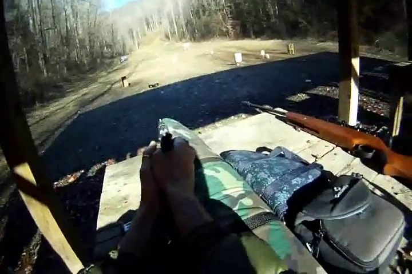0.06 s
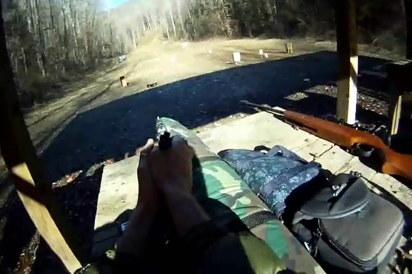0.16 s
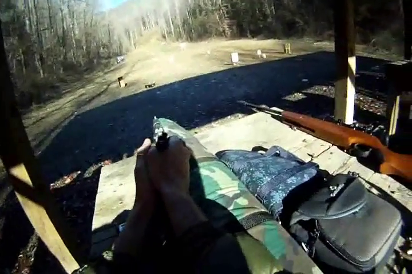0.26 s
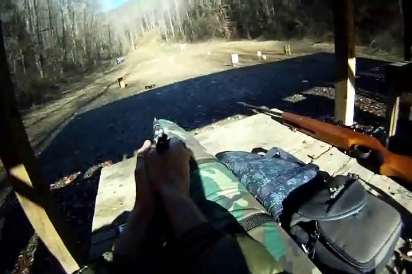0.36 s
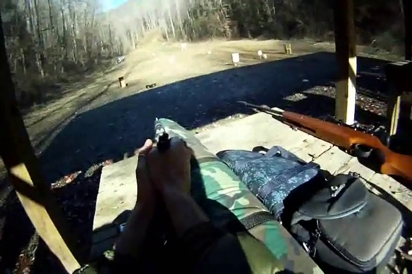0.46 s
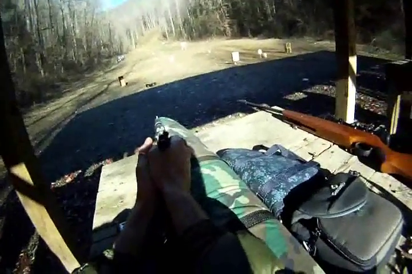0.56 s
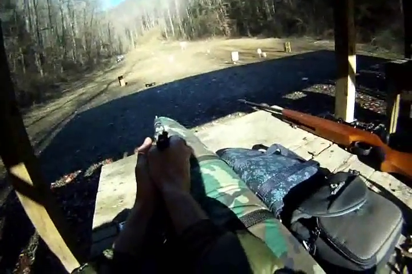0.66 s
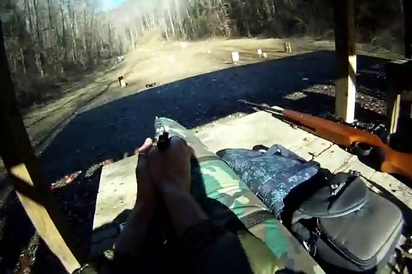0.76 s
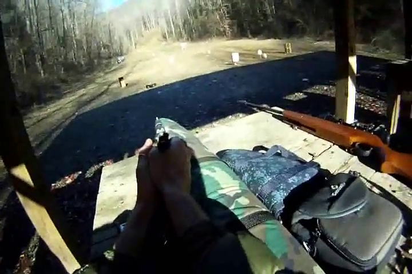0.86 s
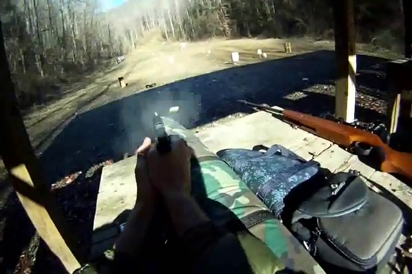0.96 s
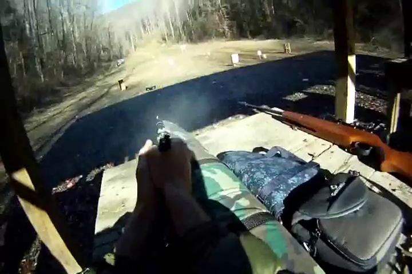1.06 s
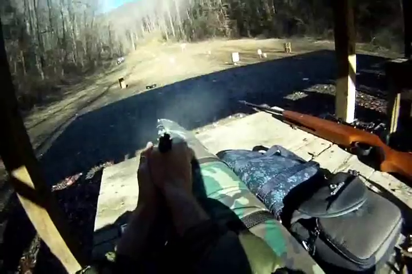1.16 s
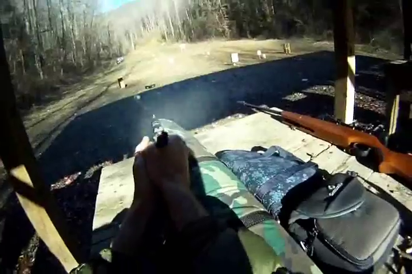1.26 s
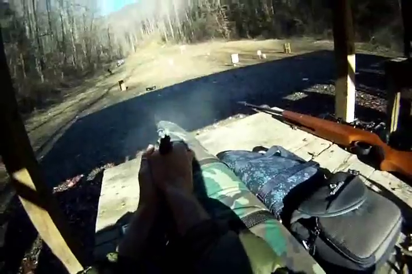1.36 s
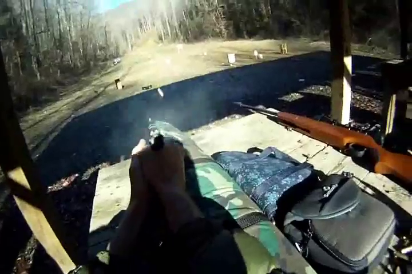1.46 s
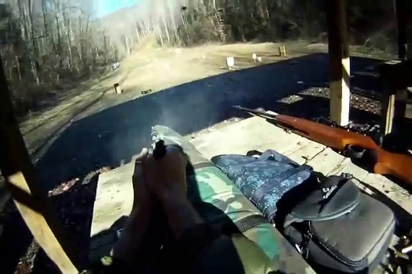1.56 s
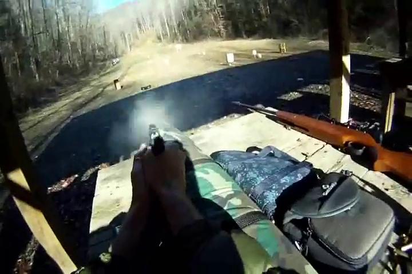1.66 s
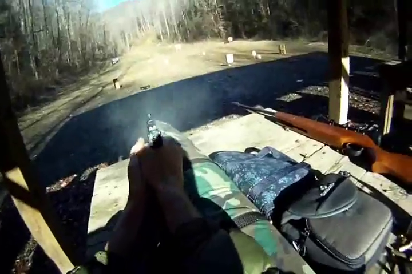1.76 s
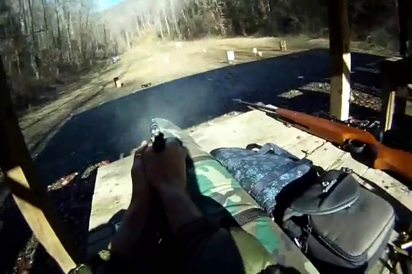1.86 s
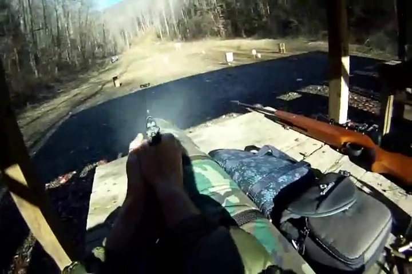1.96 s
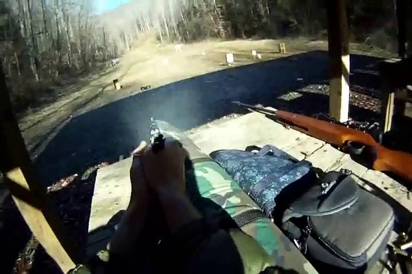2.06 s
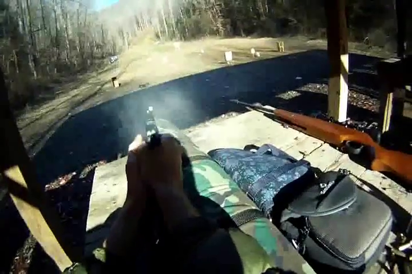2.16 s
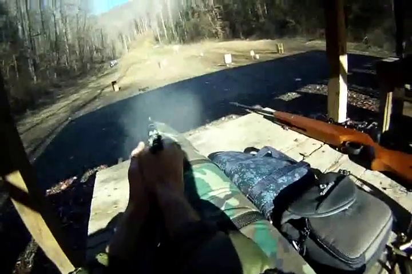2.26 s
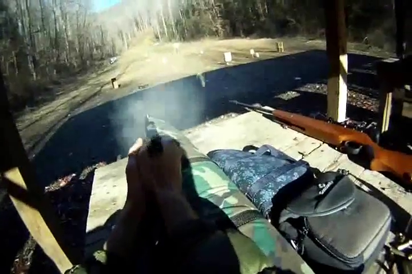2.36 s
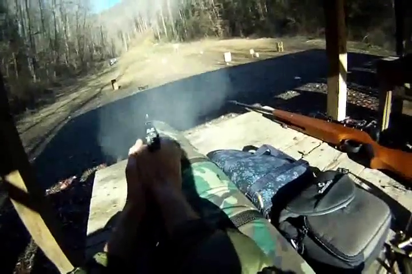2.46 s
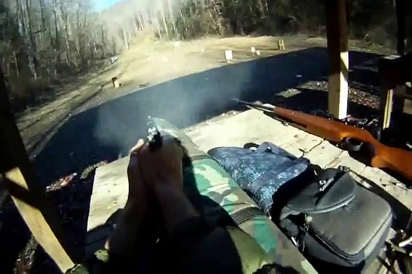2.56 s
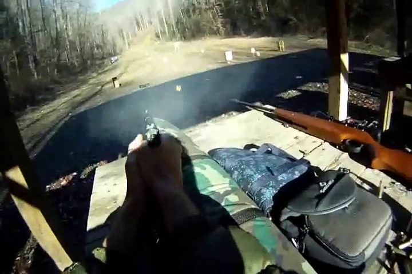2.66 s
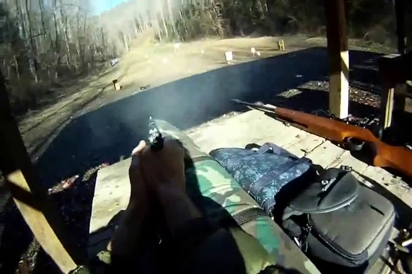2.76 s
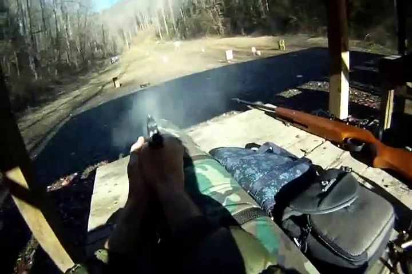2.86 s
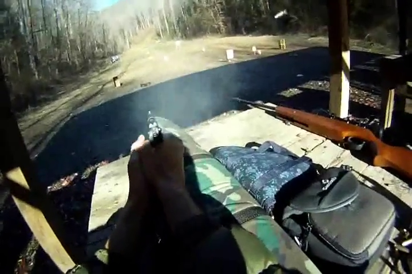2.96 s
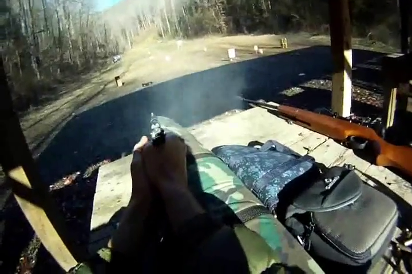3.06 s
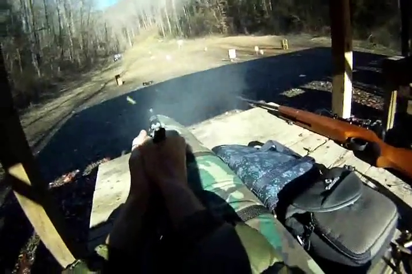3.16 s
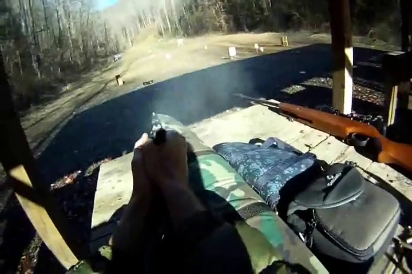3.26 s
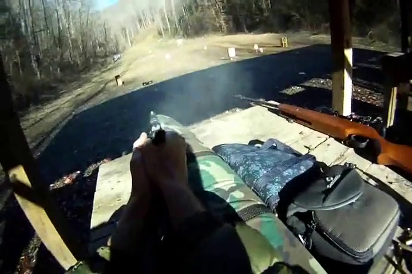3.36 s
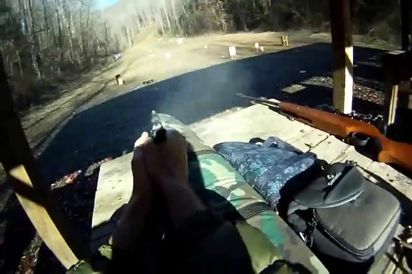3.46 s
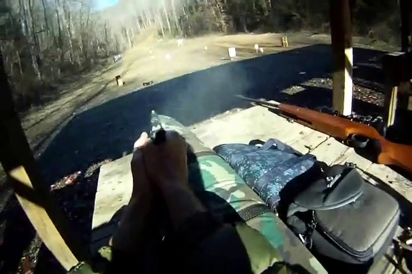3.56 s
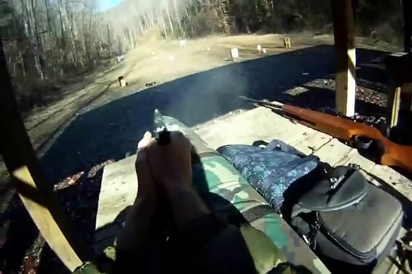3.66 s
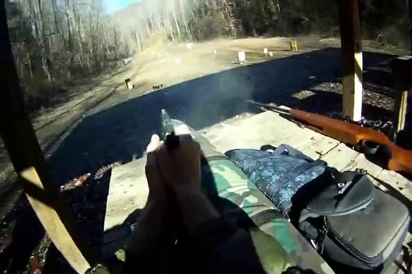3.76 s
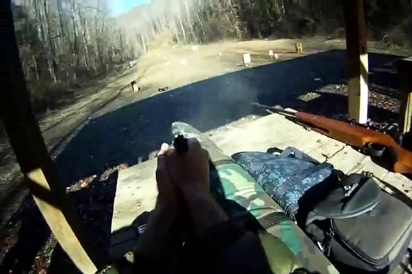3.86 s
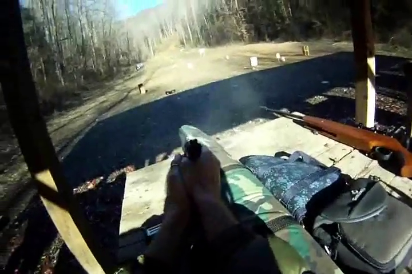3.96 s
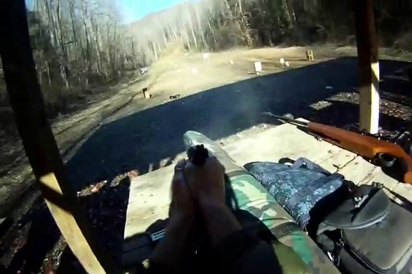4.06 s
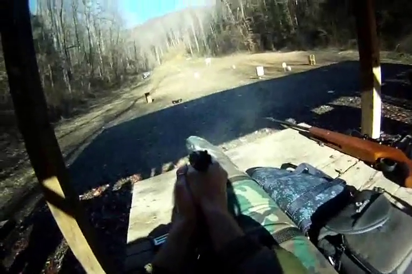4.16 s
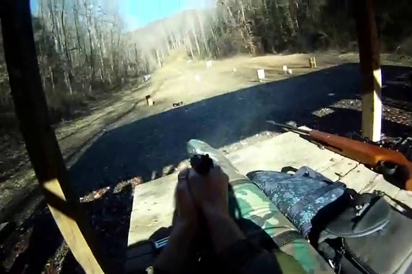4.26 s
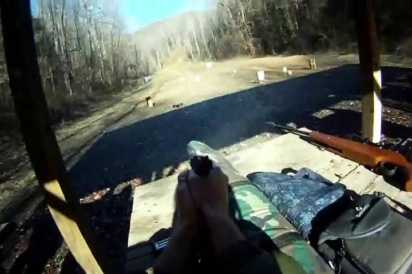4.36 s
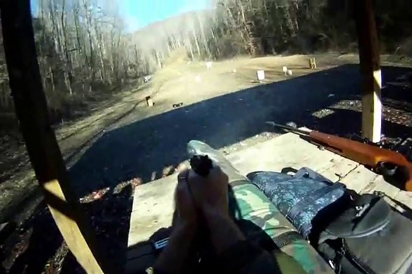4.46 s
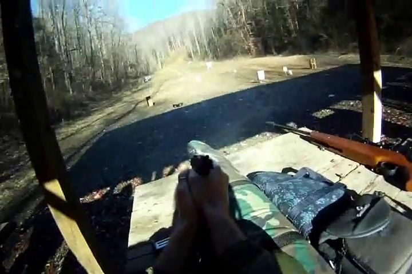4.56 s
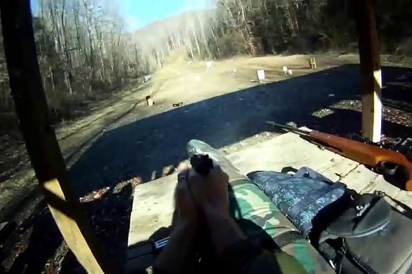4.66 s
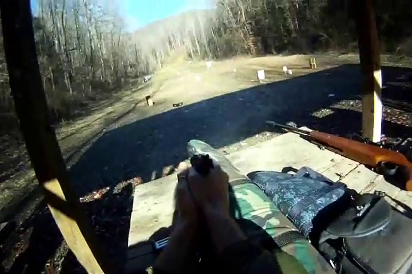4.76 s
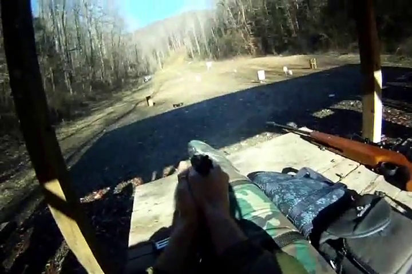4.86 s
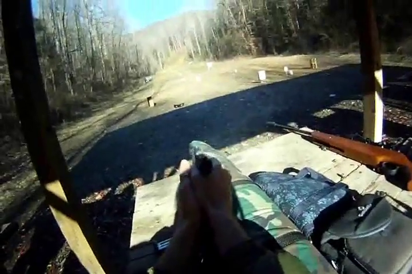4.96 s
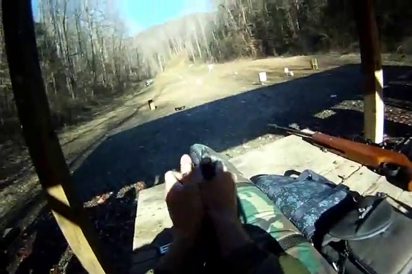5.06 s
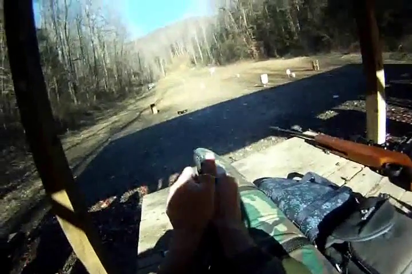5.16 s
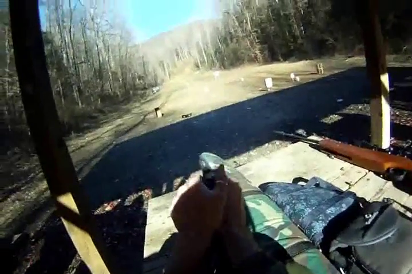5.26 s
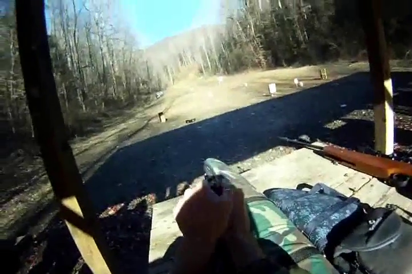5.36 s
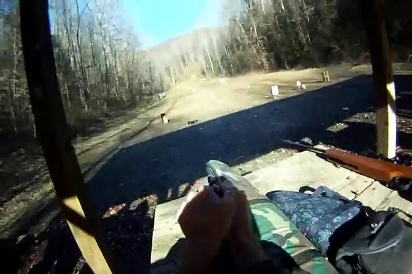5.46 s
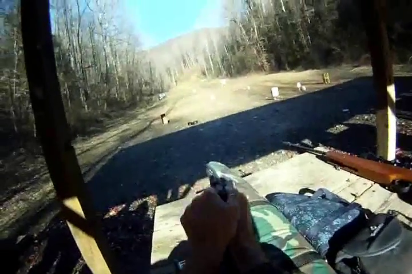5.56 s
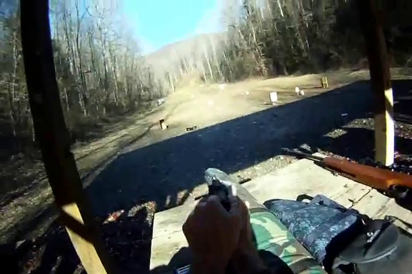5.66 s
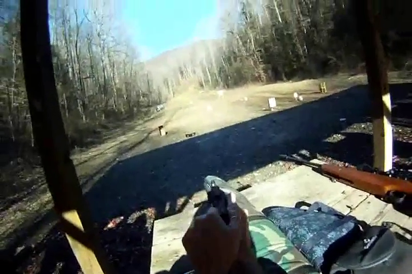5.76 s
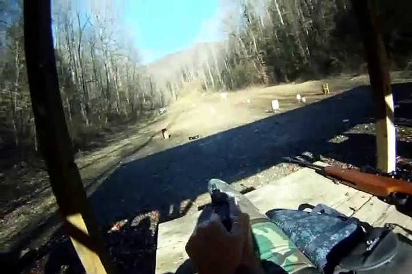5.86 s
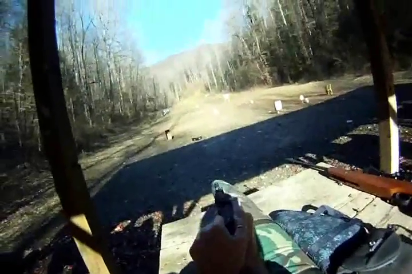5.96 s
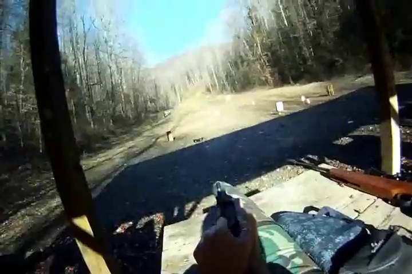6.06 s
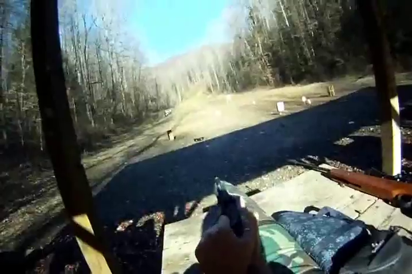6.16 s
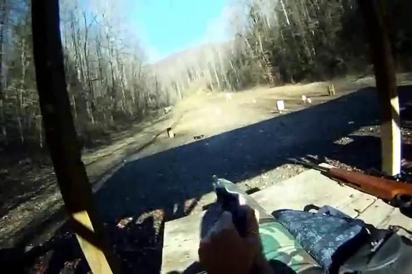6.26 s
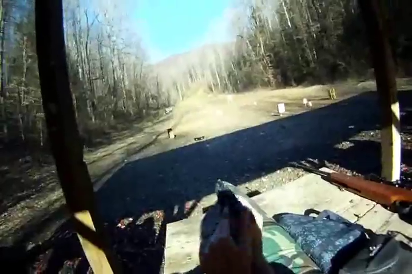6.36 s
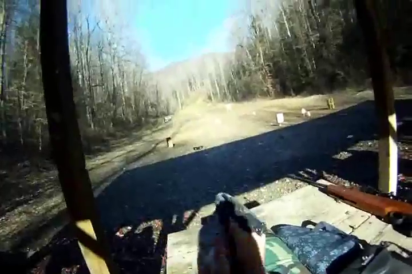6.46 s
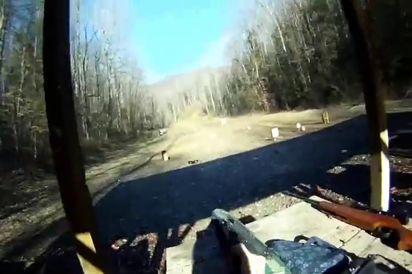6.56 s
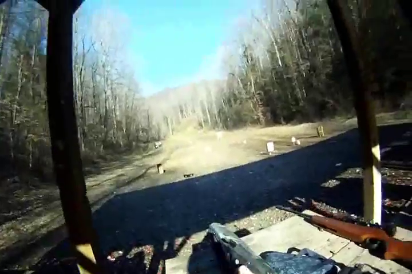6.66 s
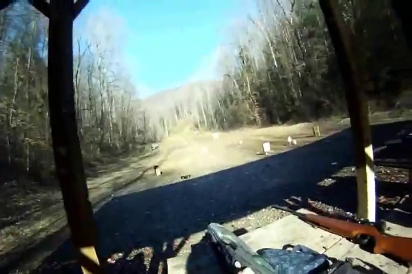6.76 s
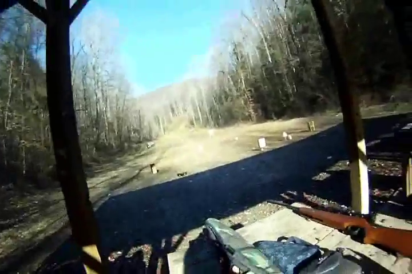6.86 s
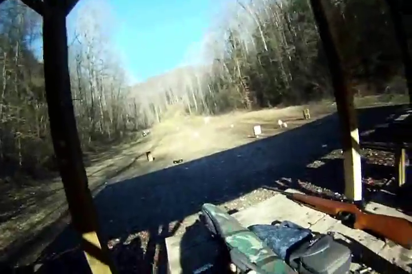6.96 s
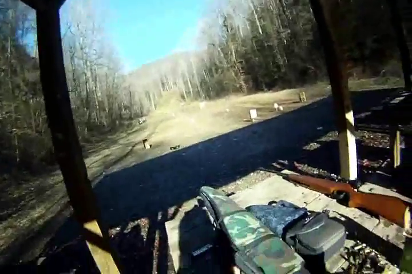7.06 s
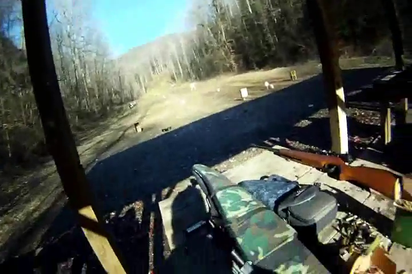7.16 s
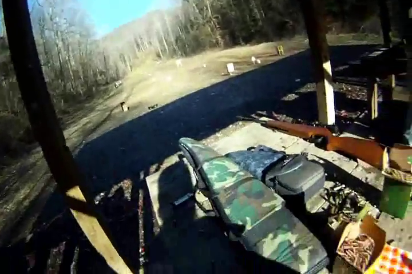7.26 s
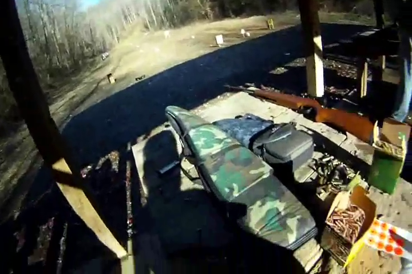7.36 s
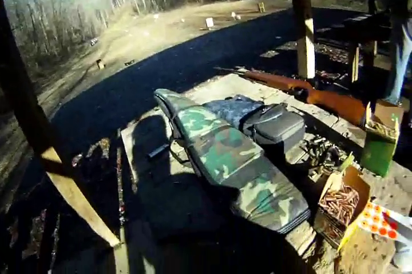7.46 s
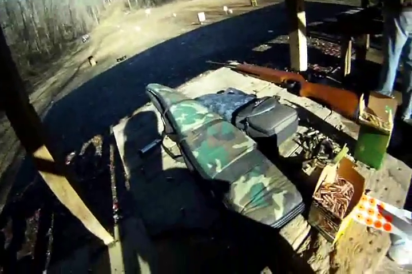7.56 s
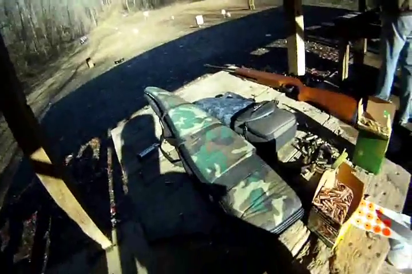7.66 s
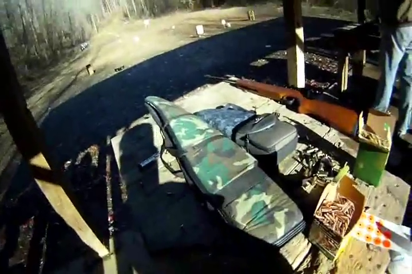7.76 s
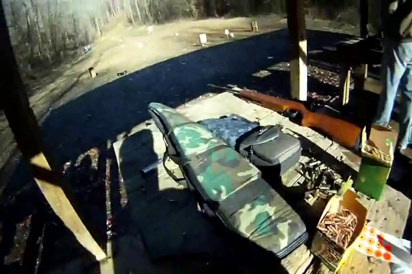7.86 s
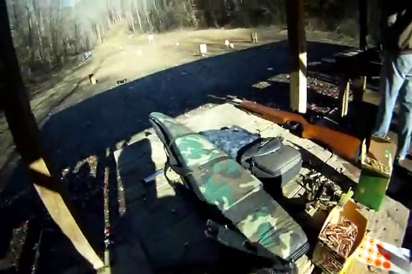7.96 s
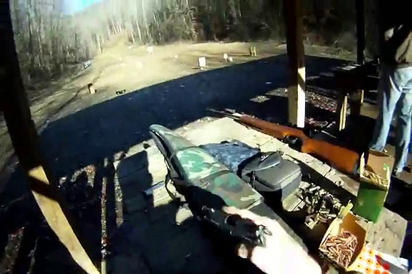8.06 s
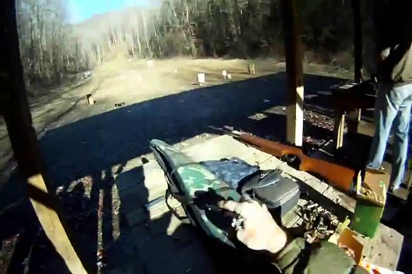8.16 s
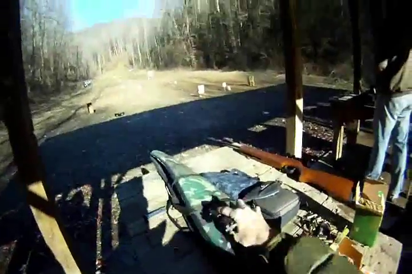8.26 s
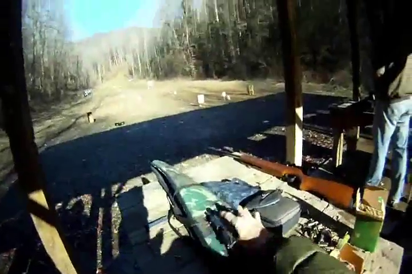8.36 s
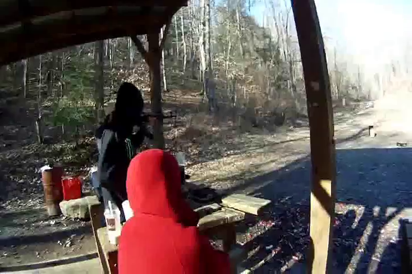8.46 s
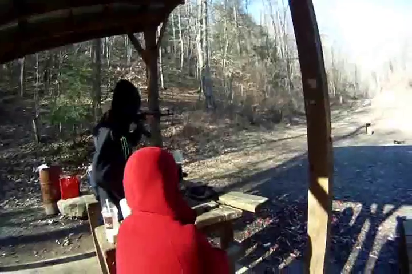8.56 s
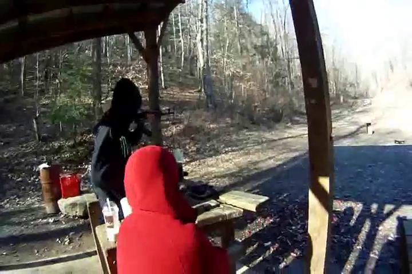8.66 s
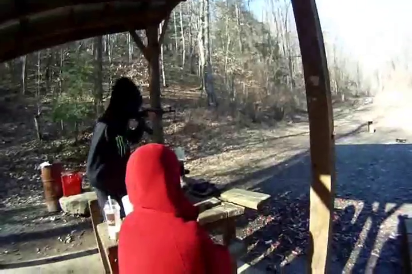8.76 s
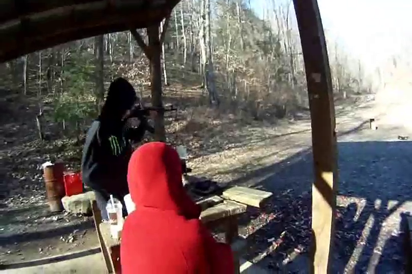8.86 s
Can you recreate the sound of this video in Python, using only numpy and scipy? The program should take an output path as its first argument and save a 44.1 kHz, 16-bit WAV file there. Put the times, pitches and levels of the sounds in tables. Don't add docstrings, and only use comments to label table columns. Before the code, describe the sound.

Small snaps and a very faint far steel ring come before ten quick, harsh pistol bangs about a quarter second apart. Each overloads the microphone and ducks its level, with fluttering slaps, a dull bank thud and a long outdoor tail. Afterwards it is quiet: light brass bounces, rubbing grip, low wind buffets, a metallic clunk on the bench, final clicks and rustles. Gritty, low-quality sound.

```python
import sys
import numpy as np
from scipy import signal
from scipy.fft import rfft, irfft
from scipy.io import wavfile
from scipy.ndimage import map_coordinates

SR = 44100
rng = np.random.default_rng(int(sys.argv[2]) if len(sys.argv) > 2 else 0)


def inscribe(sig):
    pcm = np.round(np.clip(np.atleast_2d(sig).T, -1, 1) * 32767)
    wavfile.write(sys.argv[1], SR, pcm.astype(np.int16))


def boost(x):
    u = np.asarray(x, float) / 20
    return 10 ** u


N = 393813

# start_s, blast_db, push_db (slow push on the microphone)
SHOTS = [(1.1198, 15.5, 4), (1.3866, 16, -0.5), (1.6135, 15.5, -1.5), (1.8435, 16, 0), (2.0782, 15.5, 0.5),
         (2.3123, 16, -5.5), (2.5503, 15.5, -1), (2.7983, 16, -5), (3.0395, 16, -7), (3.2760, 15.5, -0.5)]
# delay_s, level_db (under the blast), t60_s
MUZZLE = [
    (-.003, -36, .05),
    (0, -3, .018),
    (.003, 0, .0099),
]
# pitch_hz, level_db
BLAST_COLOUR = [(100, -51), (300, -33), (700, -20), (1300, -13), (1800, -3.5), (2400, -2.5), (2750, -10),
                (3700, -9.5), (4100, -16), (5400, -17), (6200, -25.5), (8000, -62)]
POST_DELAYS = [.033, .041, .045, .055, .067, .079, .117, .152, .164, .198, .203]
FIRST_SLAP_S, FLUTTER_S = .0098, .0057
SLAP_DB, SPREAD_DB, SLAP_T60_S, SLAP_WIDENS = -13.5, 27, .014, 0.36
# pitch_hz, level_db
ROOF_COLOUR = [(300, -12), (1500, -12), (1850, -5.5), (2350, -5.5), (2700, -12), (4000, -11.5),
               (6000, -6.5)]
# (pitch_hz, level_db)
EARTH_BANK = (.272, -49.5, .07, [(120, -39.5), (300, -5.5), (600, -0.5), (1400, -6), (3000, -29.5),
              (8000, -60.5)])
# delay_s, level_db (under the blast)
VALLEY_FADE = [(0, -43), (.03, -40), (0.101, -49.5), (.15, -50), (0.209, -47), (0.352, -53), (.6, -61),
               (1, -67), (2.502, -100)]
# pitch_hz, t60_s
AIR_FADE = [(300, 14), (1000, 60), (2000, 14), (3200, 4.9), (4500, 2.9), (5800, 2.2)]
# pitch_hz, level_db
WOODS_COLOUR = [(120, -40), (200, -17), (500, -13.5), (1100, -9.5), (1800, -5), (2450, -1), (2750, -10),
                (3800, -9), (4000, -14.5), (4800, -13), (5400, -17.5), (5600, -17.5), (6100, -17),
                (8000, -59.5)]
# pitch_hz, level_db
CAPSULE_RING = [(540, 4), (1000, 0), (1550, 7), (2260, 3), (3040, 5.5)]
# start_s, level_db (peak), pitch_hz
BRASS = [(3.8029, -56, 5700), (3.9325, -58, 5350), (4.1024, -57, 5250), (4.1704, -58, 4795),
         (4.2912, -60, 5190), (4.5794, -62, 3650)]
# start_s, level_db (peak), pitch_hz
TICKS = [(.069, -57, 4370), (5.369, -56, 3650), (6.002, -55.5, 3533), (6.290, -49, 1856),
         (6.293, -50, 2490), (8.133, -55, 5000), (8.134, -56, 3600), (8.639, -44, 1980)]
# start_s, level_db (peak), pitch_hz
SNAPS = [(.359, -46, 1700), (.3592, -49.5, 2150), (8.806, -44, 2260)]
# start_s, level_db (peak), pitch_hz
RUBS = [(.915, -59.5, 1915), (5.237, -52, 2260), (5.523, -59, 1890), (5.548, -44.5, 2300),
        (5.562, -46, 1760), (6.966, -57, 2090), (7.937, -48.5, 1950), (8.014, -50.5, 2604),
        (8.615, -48, 2340), (8.63, -56, 1050), (8.66, -52, 2300), (8.853, -59, 2140)]
# start_s, level_db (peak), pitch_hz
BRUSHES = [(.085, -56, 1990), (.208, -58, 3500), (5.584, -54, 2390), (7.906, -55, 4300), (8.057, -56, 2100)]
# t60_s, rise_s, ring_share (0-1)
BRASS_KIND = (.05, .001, .7)
TICK_KIND = (.04, .0008, .7)
SNAP_KIND = (.022, .0003, .92)
RUB_KIND = (.12, .005, .65)
BRUSH_KIND = (.14, .007, .15)
# pitch_hz, level_db (peak), t60_s
FRAME_RING = [(1050, -53, .04), (1840, -40, .076), (2550, -41, 0.12), (3710, -31.5, 0.038),
              (4620, -41, .04), (5400, -43, 0.043)]
# pitch_hz, level_db
SCRAPE_COLOUR = [(300, -45), (1300, -8.5), (1700, -1), (2500, 0.5), (3700, -6.5), (5800, -12), (8000, -56)]
# start_s, pitch_hz, level_db, t60_s
STEEL_PLATE = (.365, 2300, -67, 1.6)
# start_s (middle of the move), level_db, half_length_s
MOVES = [(.4, -69.5, 0.28), (4.2, -61.5, .35), (5.9, -70, .15), (6.85, -68, .12), (7.47, -62, .15),
         (7.98, -65, .12), (8.3, -68, .15), (8.65, -63, .08), (8.85, -64, .08)]
# pitch_hz, level_db
LEAVES_COLOUR = [(150, -40), (500, -20), (1300, -12), (1800, -1.5), (2450, -1), (2750, -8.5), (3800, -7),
                 (4050, -14), (5400, -16.5), (6100, -22), (8000, -60.5)]
# start_s, level_db
WIND = [(0, -55), (.5, -58.5), (1.08, -54), (4.3, -59.5), (4.6, -72), (5.0, -60), (5.3, -54), (5.6, -61),
        (6.2, -58), (6.75, -50), (7.1, -49), (7.26, -50), (7.37, -41), (7.65, -49), (7.9, -58), (8.13, -51),
        (8.4, -60), (8.93, -53.5)]
# pitch_hz, level_db
RUMBLE_COLOUR = [(8.8, -29), (15, -1), (60, -5), (74, -11.5), (97, -24), (126, -22), (300, -30.5),
                 (390, -63), (660, -120)]
# pitch_hz, level_db
HISS_COLOUR = [(35, -26), (60, 1), (110, -6.5), (250, -11), (700, -17), (2400, -23.5), (3700, -28),
               (4000, -27), (5350, -29), (5600, -35), (6100, -35.5), (8000, -68.5)]
# pitch_hz, width_hz, lift_db
HOUSING = [(1200, 110, 3), (1560, 83, 1.5), (1890, 55, 5.5), (2300, 130, 2.5), (3130, 170, 4.5),
           (3620, 140, 5.5), (5180, 150, 5.5)]


def unit(x):
    return x / np.sqrt(np.mean(x ** 2) + 1e-20)


def along(points, hz):
    f, v = np.transpose(points)
    return np.interp(np.log(hz + 1), np.log(f + 1), v)


def coloured(x, spectrum):
    level_db = along(spectrum, np.fft.rfftfreq(4096, 1 / SR))
    cepstrum = irfft(np.log(boost(level_db) + 1e-5))
    cepstrum[1:2048] *= 2
    cepstrum[2049:] = 0
    h = irfft(np.exp(rfft(cepstrum)))
    return signal.fftconvolve(x, h / np.linalg.norm(h))[:len(x)]


def wobble(rate):
    knots = rng.standard_normal(int(N * rate / SR) + 4)
    return map_coordinates(knots, [np.arange(N) * rate / SR])


def add(track, s, x):
    part = track[round(s * SR):][:len(x)]
    part += x[:len(part)]


def pistol():
    out = np.zeros(N)
    lead_s, alike = .005, .87
    t = np.arange(SR // 4) / SR - lead_s
    power = np.zeros(len(t))
    fronts = np.zeros(len(t))
    for delay, db, t60 in slaps():
        power += boost(2 * db - 120 * np.abs(t - delay) / t60) * np.clip((t - delay) / .001, 0, 1) ** 2
        add(fronts, lead_s + delay + .0006, np.array([-boost(db + 11.5 - 90 * delay)]))
    shape = np.sqrt(power)
    rounded = np.hanning(11) / 4
    late = np.clip((t - .012) / 0.048, 0, 1)
    place = rng.standard_normal(5 * SR // 2)
    for s, db, _ in SHOTS:
        grain = alike * place + np.sqrt(1 - alike ** 2) * rng.standard_normal(len(place))
        uneven_fronts = fronts * boost(1.4 * rng.standard_normal(len(t)))
        near = np.convolve(uneven_fronts, rounded, "same") + shape * grain[:len(t)]
        under_roof = (1 - late) * near + coloured(late * near, ROOF_COLOUR)
        add(out, s - lead_s, boost(db) * coloured(under_roof, BLAST_COLOUR))
        add(out, s + EARTH_BANK[0], boost(db) * earth_bank(grain[SR:][:len(t)]))
        add(out, s, boost(db) * valley(grain[::-1]))
    return out


def slaps():
    rows = list(MUZZLE)
    for delay in [FIRST_SLAP_S + k * FLUTTER_S for k in range(4)] + list(POST_DELAYS):
        ratio = delay / FIRST_SLAP_S
        rows.append((delay, SLAP_DB - SPREAD_DB * np.log10(ratio), SLAP_T60_S * ratio ** SLAP_WIDENS))
    return rows


def earth_bank(noise):
    _, db, t60, colour = EARTH_BANK
    t = np.arange(len(noise)) / SR
    return boost(db) * coloured(boost(-60 * t / t60) * noise, colour)


def valley(noise):
    hz, t, z = signal.stft(noise, SR, nperseg=256)
    fade = boost(-60 * t / np.abs(along(AIR_FADE, hz))[:, None])
    tail = signal.istft(z * fade, SR, nperseg=256)[1][:len(noise)]
    level_db = np.interp(np.arange(len(noise)) / SR, *np.transpose(VALLEY_FADE))
    return coloured(tail * boost(level_db), WOODS_COLOUR)


def overload():
    out = np.zeros(N)
    t = np.arange(SR // 20) / SR
    pull = -1.9 * np.sin(np.pi * np.clip(t / .0066, 0, 1) ** 1.3) ** 2
    back = np.maximum(t - .006, 0) / 0.002797
    swing = 0.33 * back * np.exp(-back)
    held = np.clip((.0068 - t) / 0.0019, 0, 1)
    for s, _, push_db in SHOTS:
        ring = np.zeros(len(t))
        for hz, db in CAPSULE_RING:
            level = boost(db + rng.normal(0, 2.5))
            ring += level * np.cos(2 * np.pi * hz * t + rng.normal(0, .4))
        add(out, s, boost(push_db) * pull + swing - held * ring)
    return out


def handling():
    out = np.zeros(N)
    t = np.arange(SR // 4) / SR
    contacts = []
    for rows, kind in ((SNAPS, SNAP_KIND), (TICKS, TICK_KIND), (BRUSHES, BRUSH_KIND),
                       (RUBS, RUB_KIND), (BRASS, BRASS_KIND)):
        contacts += [(*row, *kind) for row in rows]
    contacts += [(7.712, db, hz, t60, 4 / hz, 0.67) for hz, db, t60 in FRAME_RING]
    for s, db, hz, t60, rise, share in contacts:
        noise = rng.standard_normal((2, len(t)))
        drift = 0.088 * np.cumsum(noise[0])
        ring = np.sqrt(2) * np.sin(2 * np.pi * hz * t + drift)
        scrape = coloured(noise[1], SCRAPE_COLOUR)
        burst = np.sqrt(share) * ring + np.sqrt(1 - share) * scrape
        add(out, s, boost(db - 3 - 60 * t / t60) * (1 - np.exp(-t / rise)) * burst)
    return out


def steel_plate():
    out = np.zeros(N)
    s, hz, db, t60 = STEEL_PLATE
    t = np.arange(SR) / SR
    level = boost(db - 60 * t / t60 + 3.5 * wobble(55)[:SR])
    add(out, s, level * np.minimum(t / .02, 1) * np.sin(2 * np.pi * hz * t))
    return out


def rustle():
    t = np.arange(N) / SR
    moving = boost(-69)
    for s, db, half in MOVES:
        moving = moving + boost(db) * np.exp(-((t - s) / half) ** 2)
    grains = boost(1.3 * wobble(18) + 1.4 * wobble(150)) * rng.standard_normal(N)
    return boost(-4.5) * moving * unit(coloured(grains, LEAVES_COLOUR))


def wind():
    buffet_db = np.interp(np.arange(N) / SR, *np.transpose(WIND)) + 3 * wobble(17)
    thump = unit(boost(1.5 * wobble(8.9)) * coloured(rng.standard_normal(N), RUMBLE_COLOUR))
    return boost(buffet_db - 2.5) * thump


def hiss():
    return boost(-59 + .8 * wobble(14)) * coloured(rng.standard_normal(N), HISS_COLOUR)


def housing(x):
    hz = np.arange(20, 9000, 10.0)
    lift_db = sum(db / (1 + (2 * (hz - centre) / width) ** 2) for centre, width, db in HOUSING)
    return coloured(x, np.c_[hz, lift_db])


def scene():
    at_capsule = wind() + hiss()
    through_air = rustle() + pistol() + handling() + steel_plate()
    return (housing(through_air) + overload() + at_capsule)[None]


def gain_control(depth_db=9, attack_s=0.0089, hold_s=0.11, recover_s=.1):
    t = np.arange(N) / SR - np.array(SHOTS)[:, :1]
    fall = 1 - np.exp(-np.maximum(t, 0) / attack_s)
    down = fall * np.clip((hold_s + recover_s - t) / recover_s, 0, 1)
    return boost(-depth_db * down.max(axis=0))


def roll_off(x):
    return signal.sosfilt(signal.butter(12, 16240, fs=SR, output="sos"), x)


def record(dry):
    clipped = np.clip(dry * gain_control(), -.92, .92)
    lowpass = signal.firwin(8821, .99 / 147)
    slow = signal.resample_poly(clipped, 40, 147, axis=1, window=lowpass)
    held = np.repeat(np.clip(slow, -1, 1), 4, axis=1)
    wide = signal.resample_poly(held, 147, 160, axis=1)[:, 1:]
    wide = np.pad(wide, ((0, 0), (0, 8)))[:, :N]
    treble_cut = signal.ellip(8, .1, 70, 15200, fs=SR, output="sos")
    mix = np.clip(signal.sosfiltfilt(treble_cut, wide), -1, 1)
    return roll_off(mix)


dry = scene()
out = record(dry)
inscribe(out)
```